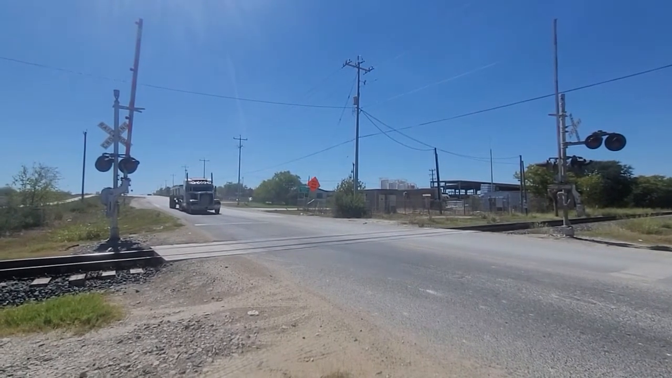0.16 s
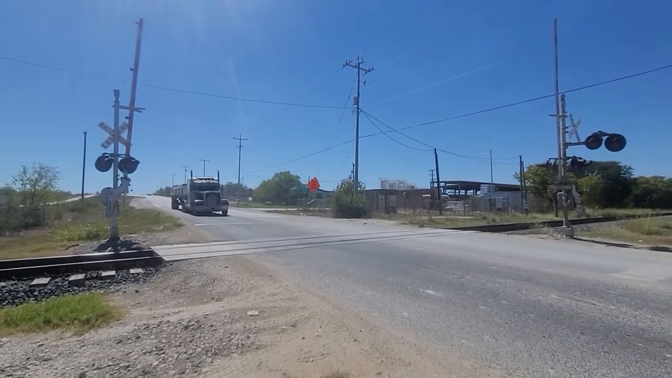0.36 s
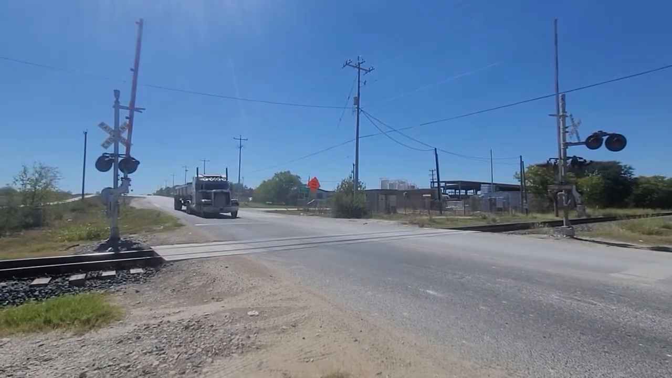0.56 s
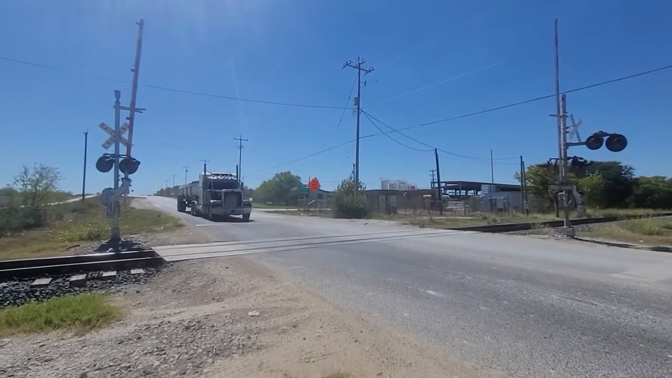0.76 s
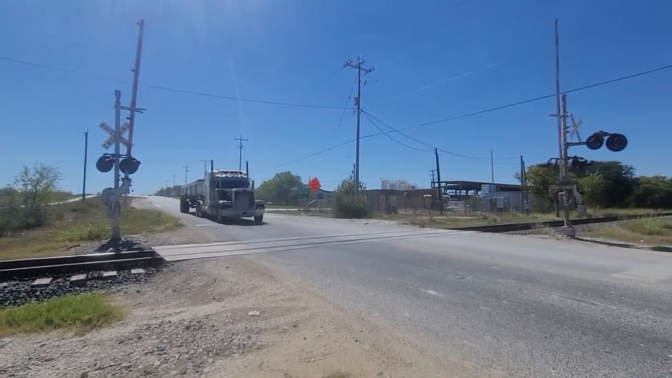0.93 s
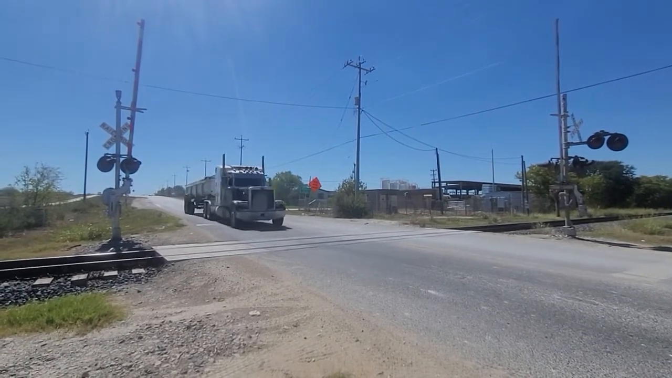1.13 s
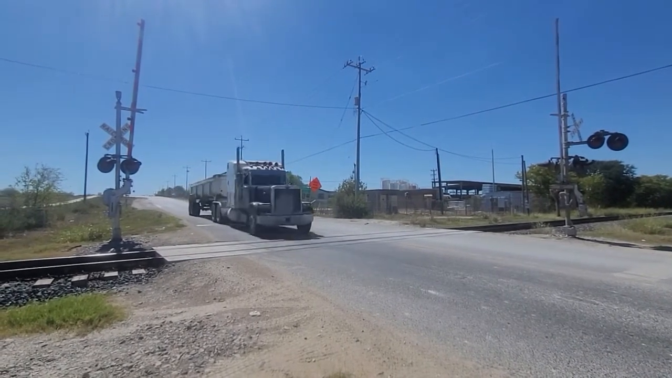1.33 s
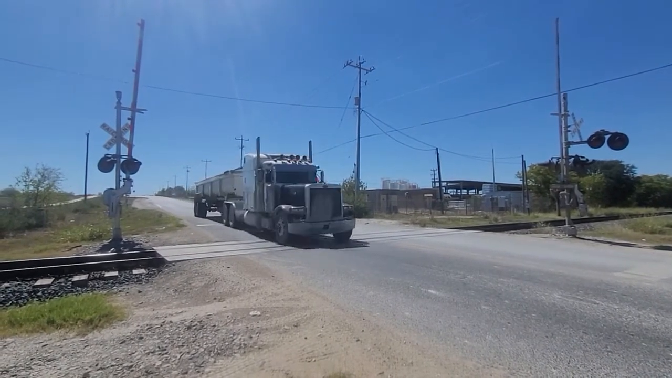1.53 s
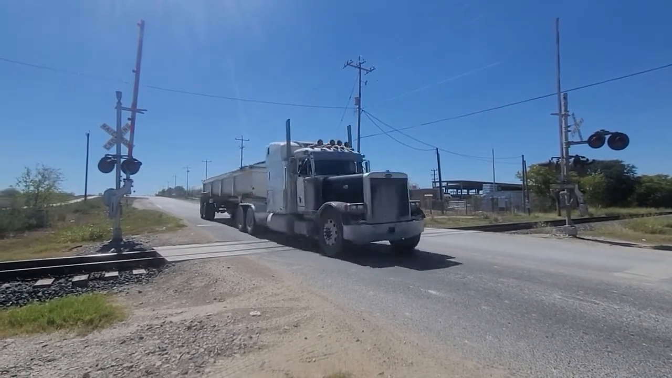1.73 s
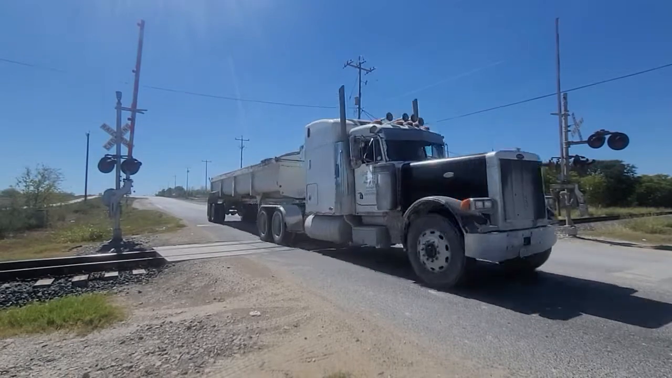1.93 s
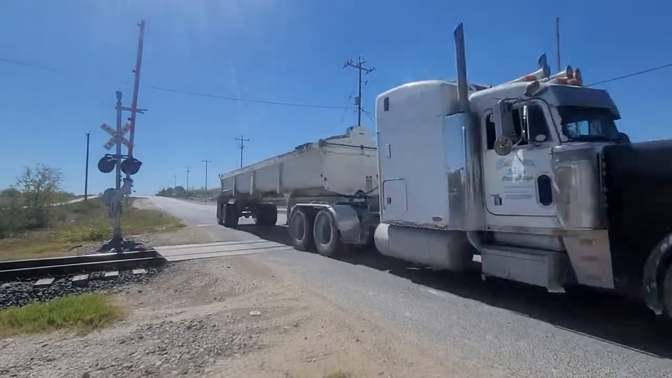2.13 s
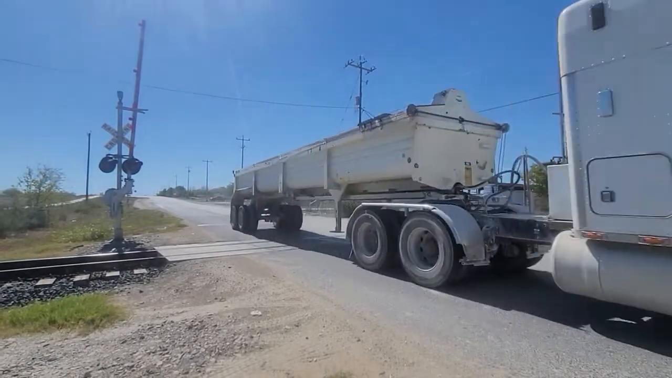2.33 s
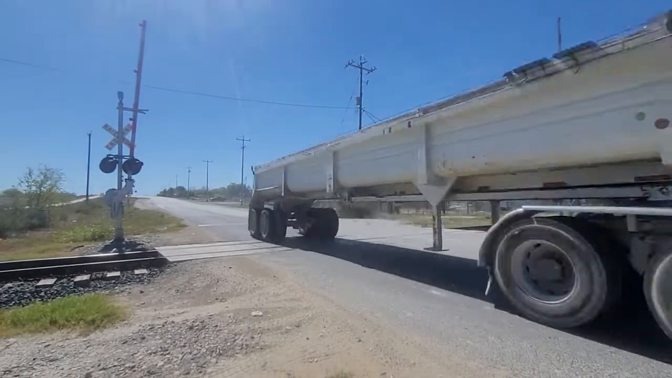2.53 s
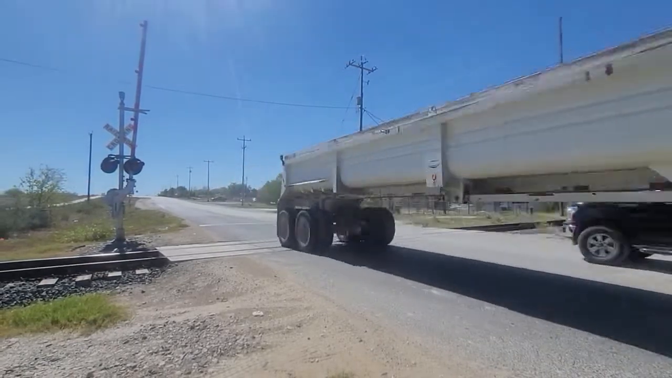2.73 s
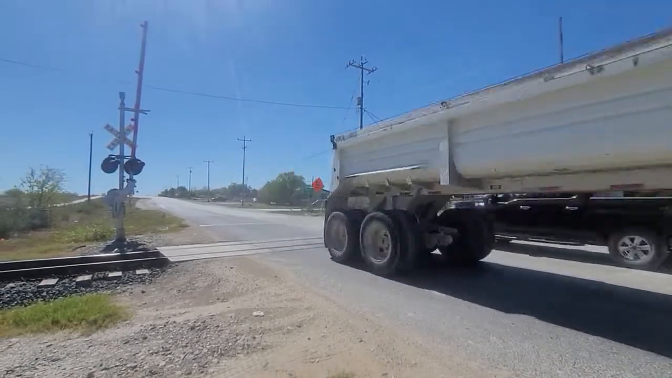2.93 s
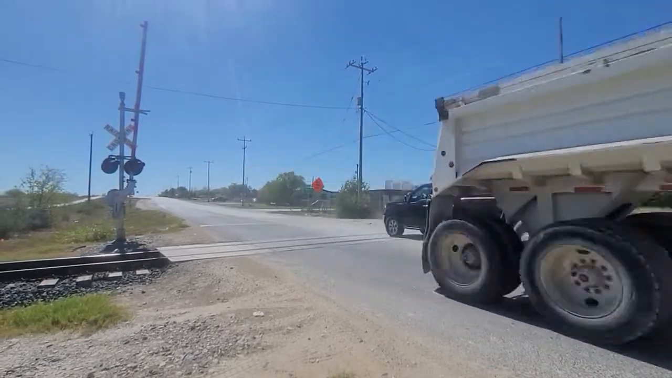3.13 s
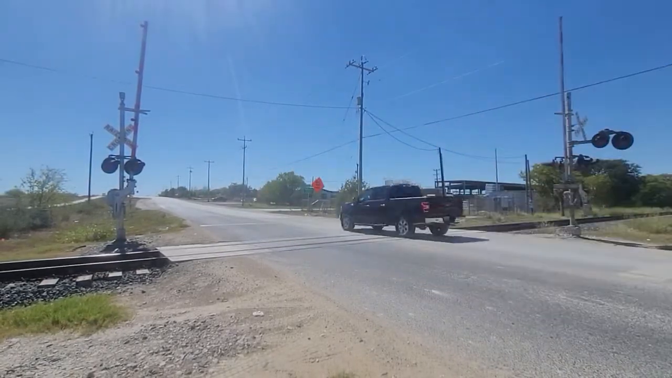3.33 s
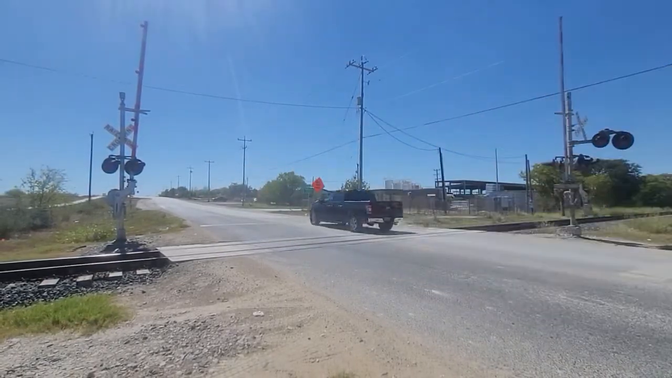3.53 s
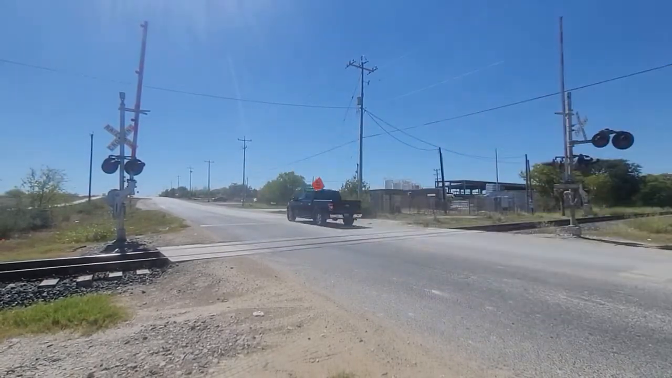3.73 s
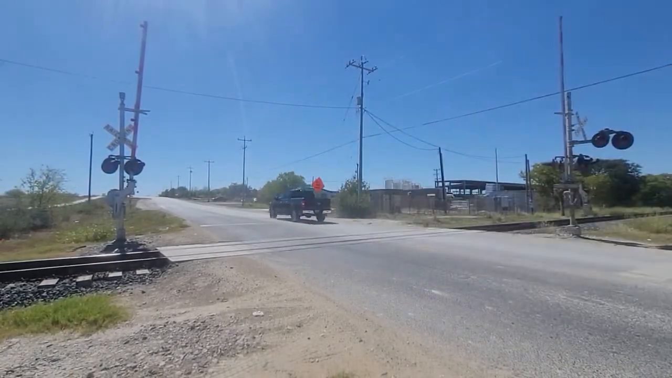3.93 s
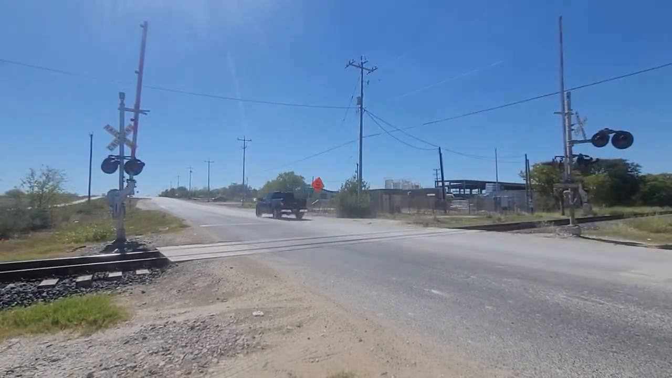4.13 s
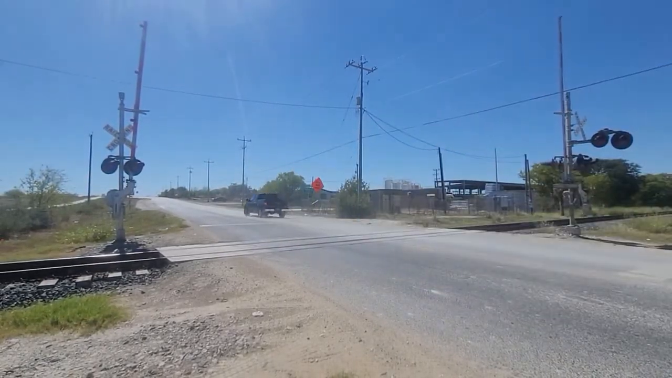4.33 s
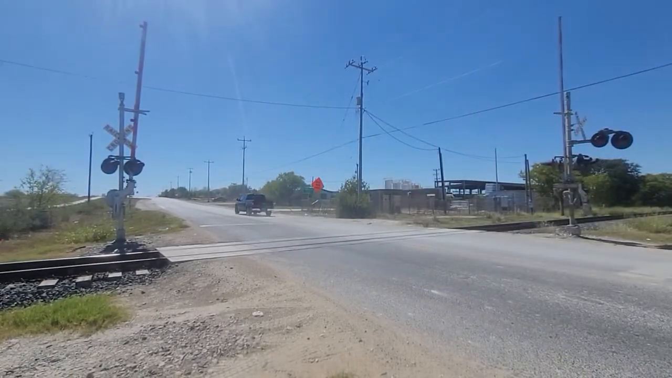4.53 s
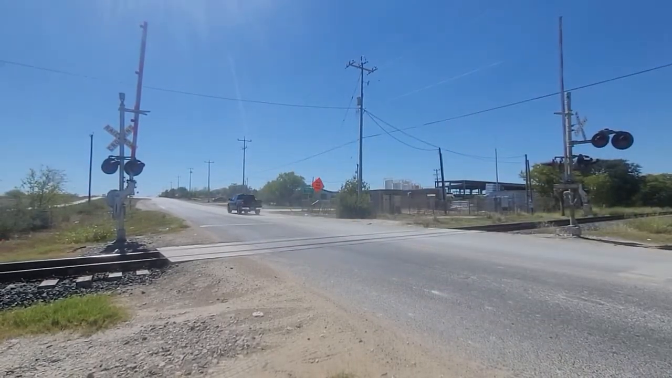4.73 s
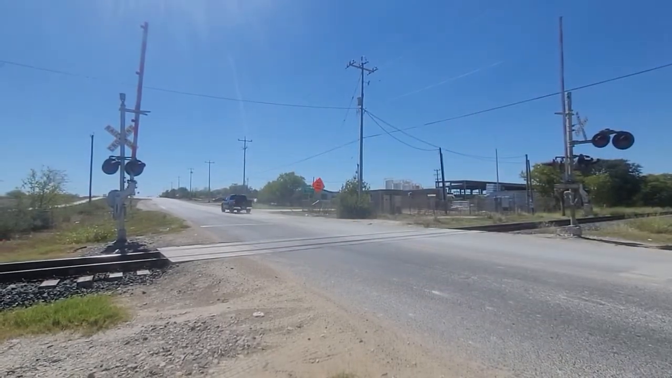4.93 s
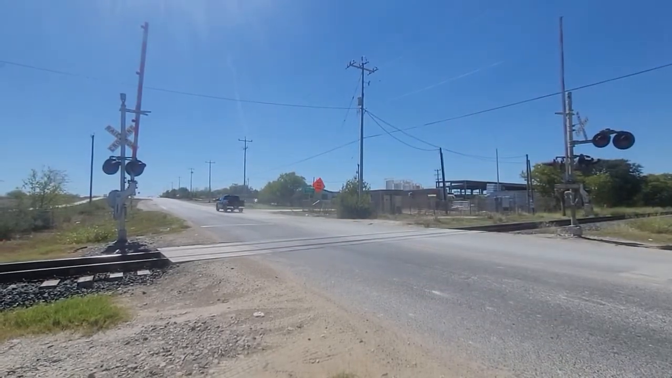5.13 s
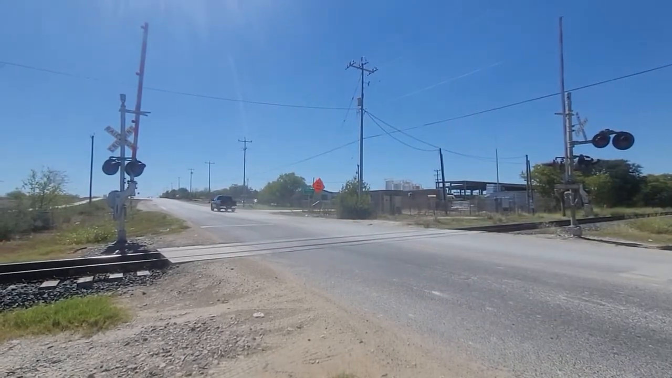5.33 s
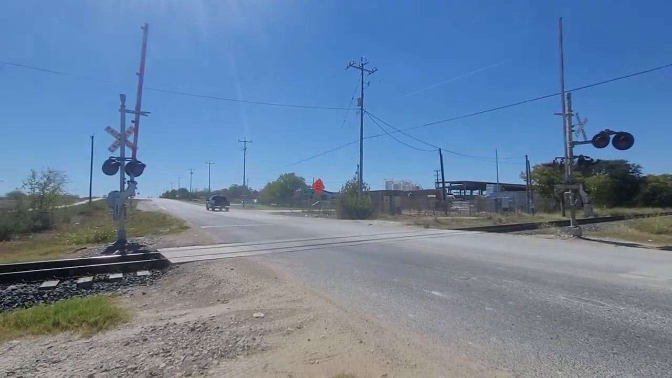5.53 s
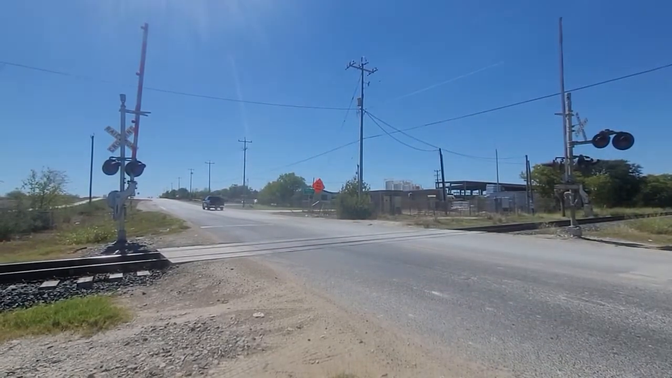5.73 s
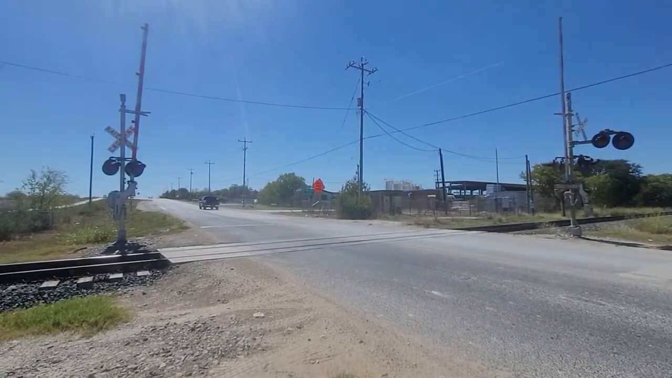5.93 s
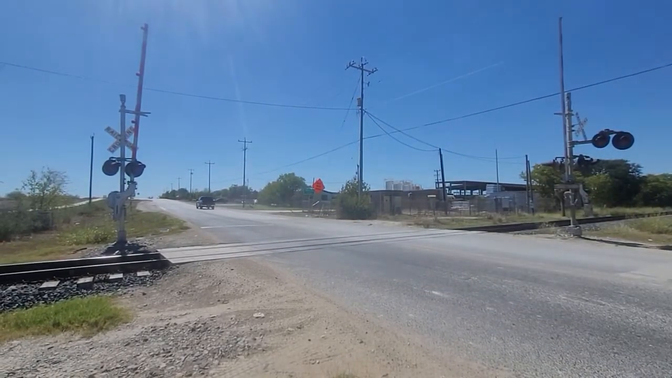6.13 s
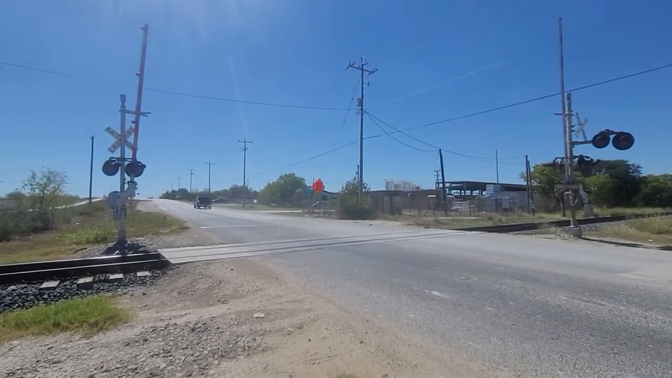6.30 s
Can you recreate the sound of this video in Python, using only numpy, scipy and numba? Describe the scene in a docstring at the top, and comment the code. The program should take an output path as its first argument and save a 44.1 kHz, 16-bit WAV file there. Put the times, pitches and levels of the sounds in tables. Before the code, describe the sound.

A heavy dump truck clanks and booms over a railroad crossing and passes close by, then a pickup's tyres recede.

```python
"""Tipper truck on a level crossing.

A heavy tipper rolls over the rails and passes a phone on the verge; a pickup then drives away.
The empty steel body booms, drones and clanks on each jolt, wheels knock on the rails, air sings
in the tread grooves, tyres hiss, the diesel hums far off. The phone's two ports hear each vehicle
a fraction of a millisecond apart, each in its own colour."""
import sys
import numpy as np
from scipy import signal
from scipy.fft import rfft, irfft, next_fast_len
from scipy.io import wavfile
from scipy.ndimage import uniform_filter1d, map_coordinates
from numba import njit

SR = 44100
rng = np.random.default_rng(int(sys.argv[2]) if len(sys.argv) > 2 else 0)


def dump_mix(stems):
    """Bounce the given channels to the path in sys.argv[1] as a 16-bit WAV at rate SR."""
    frames = np.atleast_2d(stems).T  # one column per channel
    limited = np.clip(frames, -1, 1)  # hard clip at full scale
    pcm = np.round(limited * 32767).astype(np.int16)
    wavfile.write(sys.argv[1], SR, pcm)


N = 284886

# diesel hum: t/s, level/dB
DIESEL_LEVEL = [(0, -32.5), (1.4, -35.5), (2.4, -27.5), (3.6, -39), (4.1, -56), (4.4, -31.5), (6.46, -43.5)]
# its harmonics: order, gain/dB
DIESEL_ORDERS = [(1, 0), (2, -1), (3, -11)]
# source zones on the truck: front/m, rear/m (behind the bumper), level/dB alongside front, rear,
# extra loss/(dB/m) coming, leaving, far floor/dB
RUMBLE_ZONE = (8.5, 30.5, -16, -23.5, 0.02, 0.2, -31)
DRONE_ZONE = (6, 24.5, -15.5, -16, 0.07, 0.16, -38.5)
TREAD_ZONE = (3.5, 14.5, -18.5, -17, -0.03, 0.23, -55)
WHOOSH_ZONE = (-1, 17, -24, -21, -0.12, 0.24, -61)
CLATTER_ZONE = (1.5, 17, -28.5, -30.5, 0.07, .5, -62.5)
HISS_ZONE = (5.5, 26., -33.5, -47, .95, 1.6, -100)
# noise spectra: f/Hz, relative density/dB
DRONE_SPECTRUM = [(65, -33), (110, -8.5), (140, -8.5), (194, 1.5), (254, -2.5), (312, 0.5), (392, -4),
                  (481, -10.5), (600, -13), (780, -17.5), (1320, -120)]
WHOOSH_SPECTRUM = [(560, -15), (950, -14), (1000, -3), (1680, -5.5), (1990, -12.5), (2250, -14.5),
                   (3000, -22), (3900, -31), (6600, -120)]
CLATTER_SPECTRUM = [(1180, -24), (2000, 4.5), (2240, -17), (2670, -5.5), (2970, -2.5), (3920, -5),
                    (4890, -5), (5340, -2.5), (6570, -1.5), (7500, -17.5), (9000, -38), (11700, -43),
                    (19800, -120)]
HISS_SPECTRUM = [(4400, -8), (7500, 4), (9500, -3.5), (13800, -2), (16500, -8)]
PICKUP_SPECTRUM = [(260, -37), (450, -8), (499, -9.5), (693, -4.5), (804, -0.5), (1000, -6.5), (1370, -4),
                   (1620, -4), (2210, -21.5), (2930, -25.5), (3450, -27.5), (3880, -38), (6440, -61),
                   (9200, -90), (15700, -73)]
# air modes of the tread grooves: f/Hz, width/Hz, relative level/dB
TRUCK_GROOVES = [(782, 142, -1), (694, 145, -3.5)]
PICKUP_GROOVES = [(831, 180, 9.5), (1644, 190, -4.5)]
# trailer plate modes: f/Hz, relative level/dB
PLATE_MODES = [(1930, -5), (2420, -14.5), (3130, -9.5), (3680, -16.5), (4400, -12.5), (5300, -10.5),
               (6040, -11), (6600, -15.5)]
# body boom, lower once the trailer is alongside: t/s, nominal f/Hz, level/dB
BODY_BOOM = [(1.05, 93, -61), (1.55, 96, -27), (1.8, 91.6, -29), (2.08, 95.16, -19.5), (2.27, 67.6, -26),
             (2.42, 62.6, -18), (2.6, 67.1, -20), (2.72, 72.3, -31), (3.04, 58.9, -17.5), (3.3, 69, -25),
             (3.53, 88.8, -33), (3.85, 76.8, -21.5), (4.0, 83.9, -33.5), (4.45, 67, -50)]
# loose steel slams: t/s, level/dB, hiss/dB re level, main ring f/Hz, ring/dB re level, t60/s
SLAMS = [(1.233,-23,-44,5500,-19,0.41),(1.34,-26,-47.5,4380,-8,0.44),(1.408,-30,-39,4380,-12,0.25),
         (1.516,-22.5,-16,6300,-12,0.055),(1.55,-12.5,-23,6670,-11.5,0.24),(1.5998,-21,-18,5330,-13,0.045),(1.612,-14,-20,6560,-18,0.03),
         (1.6882,-17.5,-21,3560,-9.5,0.27),(1.734,-22,-10,3170,-8,0.2),(1.778,-17.5,-13,5800,-11,0.29),(1.8407,-22.5,-12,6500,-4,0.11),
         (1.875,-27,-24,5470,1,0.12),(1.99,-13.5,-19,6700,-13,0.13),(2.063,-11.5,-18.5,6580,-10.5,0.14),(2.1392,-23,-9,6800,-8,0.35),
         (2.2319,-19,-13.5,5470,-6,0.57),(2.3,-36,-30,6700,11,0.1),(2.3395,-18,-18,5730,-6.5,0.33),(2.368,-12,-24,5430,-15,0.38),
         (2.428,-26,-23,5240,-8,0.092),(2.4736,-9,-25,5490,-8.5,0.11),(2.562,-14.5,-21,5150,-24,0.37),(2.6602,-20,-18,5730,-12,0.26),
         (2.7865,-9,-21,5810,-13,0.23),(3.05,-25,-28,5610,-10,0.3),(3.105,-13,-18,2260,-8.5,0.31),(3.336,-20,-23.5,3640,-12,0.24),
         (3.452,-39,-5,6700,-10,0.17),(3.613,-31,-24,6300,-16,0.19),(3.6599,-30.5,-25,2500,-23,0.8),(3.718,-35,-28,3060,-14,0.15),
         (3.829,-34,-25,3825,-11,0.2),(3.9286,-36,-31,2557,-14,0.12),(4.041,-36,-23,2890,-9,0.15),(4.141,-42,-24,2890,-2,0.47),
         (5.473,-51,-48.5,3370,-2,0.2)]
# wheel blows: t/s, level/dB, f/Hz
WHEEL_KNOCKS = [(1.54, -13.5, 92.4), (1.603, -10.5, 291), (1.62, -10.5, 187.5), (1.686, -8, 790),
                (1.734, -6, 770), (2.01, -5.5, 822), (2.103, -9, 806), (2.19, -4, 797), (2.234, -15, 304),
                (2.249, -9, 767), (3.336, -16, 1343), (3.379, -11.5, 743), (3.535, -15, 391),
                (3.603, -12.5, 1310), (6.0, -29, 780)]
# tailgate panel: t/s, level/dB
TAILGATE_LEVEL = [(2.9, -45), (3.3, -31), (4.4, -34.5), (5.2, -39), (6.46, -55)]
# pickup: t/s, tyre level/dB, tread level/dB, rumble level/dB
PICKUP_LEVELS = [(2.4, -65, -51, -54), (3.2, -39, -37, -43), (3.7, -34.5, -34.5, -27.5),
                 (4.4, -32, -34, -36), (5.3, -35, -53, -33), (6.46, -37.5, -43, -46)]
# its whine: t/s, f/Hz
WHINE_PITCH = [(5.7, 338), (6.46, 351)]
# its whine: t/s, level/dB
WHINE_LEVEL = [(5.7, -63), (6.05, -49.5), (6.46, -42.5)]
# left port re right: f/Hz, gain/dB
PORT_BALANCE = [(60, 0), (200, -1.5), (400, -4.5), (550, -4.5), (800, -3.5), (1300, -2), (1800, -3),
                (2500, 0), (3300, -2), (5500, -3), (6800, -6), (8000, 4.5), (9500, -3.5), (15000, -1)]
# left-right difference: f/Hz, gain/dB
SIDE_GAIN = [(30, 6), (100, -4), (600, 3.5), (1400, 1.5), (3000, 0), (6500, 0)]

SPEED_M_S, VERGE_M, BUMPER_PASSES_S = 17.15, 5.87, 1.569
DIESEL_HZ, ENGINE_AT_M, TREAD_AT_M, BODY_AT_M = 39.64, 13.82, 14.6, 6.92
LAG_MS, LAG_SWING_MS, PICKUP_LAG_MS = 0.091, 0.381, -0.22  # left port's delay
FOCUS_AHEAD, FOCUS_BEHIND, FOCUS_AT_M = 0.38, 1.9, 45  # the tail sounds narrower than the flank
RAILS_S, SHAKE_UP_S, CALM_CLATTER_DB, CALM_HISS_DB = 1.41, 0.52, -11, -12
PINGS_PER_PLATE_S, PING_DB, TICK_DB, PING_SCATTER_DB = 30, -6, -11, 3.5
CHATTER_S, ATTACK_SHARE, ATTACK_CAP_S, GRIT_DB, GRIT_S = 0.007, 0.015, 0.0025, 2.2, 0.005
SLAM_NOISE_DB, PLATES_DB, PLATE_SCATTER_DB = -15.5, -9.5, 3
PLATE_WIDTH_HZ, RING_WIDTH_HZ = 70., 330.
KNOCK_T60_CYCLES, KNOCK_RISE_S = 36, 0.00086
LULL_S, LULL_WIDTH_S, LULL_DB = 1.66, 0.015, -6
BASS_CUT_HZ, TOP_CUT_HZ = 30., 15820
TIME_S = np.arange(N) / SR


def undb(db):
    """dB to gain."""
    return 10 ** (np.asarray(db) / 20)


def unit(x):
    """Scale to rms 1."""
    return x / np.sqrt(np.mean(x ** 2))


def curves(table):
    """Columns interpolated to one value a sample."""
    times_s, *columns = np.transpose(table)
    return [np.interp(TIME_S, times_s, column) for column in columns]


def colour(x, spectrum):
    """Filter by (f/Hz, gain/dB) points; ends mirrored against clicks."""
    hz, db = np.transpose(spectrum)
    edge = SR // 20
    x = np.concatenate([x[..., edge:0:-1], x, x[..., -2:-edge:-1]], axis=-1)
    size = next_fast_len(x.shape[-1])
    bins_hz = np.maximum(np.arange(size // 2 + 1) * SR / size, 1)
    gain = undb(np.interp(np.log(bins_hz), np.log(hz), db))
    return irfft(rfft(x, size) * gain, size)[..., edge:edge + N]


@njit
def svf(x, hz, width_hz):
    """State-variable band-pass, moving centre."""
    y, band, low = np.empty(len(x)), 0., 0.
    for i in range(len(x)):
        g, k = np.tan(np.pi * hz[i] / SR), width_hz / hz[i]
        v = (band + g * (x[i] - low)) / (1 + g * (g + k))
        band, low, y[i] = 2 * v - band, low + 2 * g * v, k * v
    return y


def resonate(rows, hz, width_hz):
    """Band-pass each row; hz is a number or a curve."""
    return np.array([svf(row, hz * np.ones(len(row)), float(width_hz)) for row in rows])


def walk(rate_hz):
    """Random steps, smoothed twice; spread near 1."""
    hold = int(SR / rate_hz)
    steps = np.repeat(rng.standard_normal(N // hold + 1), hold)
    return 1.43 * uniform_filter1d(uniform_filter1d(steps, hold), hold)[:N]


def strands():
    """White noise rows: shared, left, right."""
    return rng.standard_normal((3, N))


def noise(spectrum):
    """Coloured strands, rms 1."""
    return unit(colour(strands(), spectrum))


def ports(x, lag_ms, coherence):
    """Strands to stereo; the shared one lags on the left."""
    coherence = np.clip(coherence, 0, 1)
    late = map_coordinates(x[0], [np.arange(N) - lag_ms * SR / 1000], order=3, mode="mirror")
    return np.sqrt(coherence) * np.array([late, x[0]]) + np.sqrt(1 - coherence) * x[1:]


def tone(hz, db, orders, waver_db, drift, rate_hz):
    """Wavering sines on multiples of a pitch curve."""
    phase = 2 * np.pi * np.cumsum(hz * (1 + drift * walk(rate_hz))) / SR
    out = 0
    for order, order_db in orders:
        gain = np.sqrt(2) * undb(db + order_db + waver_db * walk(rate_hz))
        out += gain * np.sin(order * phase + rng.uniform(0, 2 * np.pi))
    return out


def past_m(at_m):
    """How far a point at_m behind the bumper has passed the phone."""
    return SPEED_M_S * (TIME_S - BUMPER_PASSES_S) - at_m


def bearing(at_m):
    """Sine of the direction to that point: -1 coming, 1 going."""
    return past_m(at_m) / np.hypot(past_m(at_m), VERGE_M)


def doppler(at_m):
    """Pitch factor of that point."""
    return 1 / (1 + SPEED_M_S * bearing(at_m) / 343)


def passing_db(front_m, rear_m, front_db, rear_db, coming_db_m, leaving_db_m, far_db):
    """Level from a zone's nearest point: spreading and extra loss, over a far floor."""
    gap_m = np.maximum(0, np.maximum(-past_m(front_m), past_m(rear_m)))
    range_m = np.hypot(gap_m, VERGE_M)
    extra_db_m = np.where(past_m(front_m) < 0, coming_db_m, leaving_db_m)
    loss_db = 20 * np.log10(range_m / VERGE_M) + (range_m - VERGE_M) * extra_db_m
    source_db = np.interp(past_m(0), [front_m, rear_m], [front_db, rear_db])
    return 20 * np.log10(np.hypot(undb(source_db - loss_db), undb(far_db)))


def diesel_hum():
    """Low engine harmonics, Doppler shifted."""
    hz = DIESEL_HZ * doppler(ENGINE_AT_M)
    return tone(hz, *curves(DIESEL_LEVEL), DIESEL_ORDERS, waver_db=3.5, drift=0.0083, rate_hz=6)


def wheel_rumble(db):
    """Low roll of wheels and chassis."""
    roll = resonate(resonate(strands(), hz=80, width_hz=73), hz=70, width_hz=135)
    return unit(roll) * undb(db + 1.4 * walk(10))


def body_drone():
    """The empty body drones; its long waves reach both ports alike."""
    drone = noise(DRONE_SPECTRUM) * undb(passing_db(*DRONE_ZONE) + 1.13 * walk(20))
    drone[1:] = colour(drone[1:], [(150, -23.5), (450, 2.0)])
    return drone


def tread_song(db, grooves, shift=1):
    """Air rings in the tread grooves; shift is the Doppler factor."""
    air, song = strands(), 0
    for hz, width_hz, mode_db in grooves:
        song += undb(mode_db) * resonate(resonate(air, hz * shift, width_hz), hz * shift, 2 * width_hz)
    return unit(song) * undb(db + 1.64 * walk(25.2))


def rolling_noise(spectrum, db, slam_gain):
    """Noise band of the moving truck; slams add to it in power."""
    return noise(spectrum) * np.hypot(undb(db), slam_gain)


def plate_pings():
    """Small loose parts tap the plates at random: wandering rings plus bare ticks."""
    rings, ticks = 0, 0
    for hz, db in PLATE_MODES:
        taps = (rng.random(N) < PINGS_PER_PLATE_S / SR) * undb(PING_SCATTER_DB * rng.standard_normal(N))
        rings += undb(db / 2) * svf(taps, hz * (1 + .04 * walk(8)), PLATE_WIDTH_HZ)
        ticks += taps
    pings = undb(PING_DB) * unit(rings) + undb(TICK_DB) * unit(colour(ticks, CLATTER_SPECTRUM))
    return np.array([pings] * 3)


def body_boom():
    """The empty body booms on the jolts: one low gliding tone."""
    return tone(*curves(BODY_BOOM), [(0.98, 0.0026)], waver_db=-2.0, drift=0.04, rate_hz=20)


def steel_slams():
    """Loose steel slams, chatters and decays: clatter envelope, hiss envelope, plate rings."""
    clatter, hiss, rings = np.zeros(N + SR), np.zeros(N + SR), np.zeros((3, N + SR))
    t = np.arange(int(.4 * SR)) / SR
    step, ring_len = int(GRIT_S * SR), len(t) // 2
    for start_s, db, hiss_db, ring_hz, ring_db, t60_s in SLAMS:
        i = int((start_s - .002) * SR)
        attack = 1 - np.exp(-t / min(ATTACK_SHARE * t60_s, ATTACK_CAP_S))
        hold_s = min(CHATTER_S, t60_s / 20)
        shape = attack * undb(-60 * np.maximum(t - hold_s, 0) / t60_s)
        contacts = np.repeat(rng.standard_normal(len(t) // step + 1), step)
        grit = uniform_filter1d(contacts, step // 2)[:len(t)]
        rough = shape * undb(db + GRIT_DB * grit)
        clatter[i:i + len(t)] += undb(SLAM_NOISE_DB) * rough
        hiss[i:i + len(t)] += undb(hiss_db) * rough
        modes = [(ring_hz, ring_db, RING_WIDTH_HZ)]
        for hz, plate_db in PLATE_MODES:
            struck_db = plate_db + PLATES_DB + PLATE_SCATTER_DB * rng.standard_normal()
            modes.append((hz, struck_db, PLATE_WIDTH_HZ))
        scrape = rng.standard_normal((3, ring_len))  # many small contacts: rings are narrow noise
        for hz, mode_db, width_hz in modes:
            ring = resonate(resonate(scrape, hz, width_hz), hz, width_hz=700)
            rings[:, i:i + ring_len] += undb(mode_db) * unit(ring) * (shape * rough)[:ring_len]
    return clatter[:N], hiss[:N], rings[:, :N]


def wheel_knocks():
    """Wheels hit rail and panel edges: two damped partials a blow."""
    out, t = np.zeros(N), np.arange(int(.2 * SR)) / SR
    attack = 1 - np.exp(-t / KNOCK_RISE_S)
    for start_s, db, hz in WHEEL_KNOCKS:
        i = int(start_s * SR)
        phase = 2 * np.pi * hz * t
        partials = np.sin(phase) + 0.26 * np.sin(1.35 * phase)
        out[i:i + len(t)] += undb(db - 60 * t * hz / KNOCK_T60_CYCLES) * attack * partials
    return np.array([out] * 3)


def tailgate_hum():
    """One narrow panel resonance, driven by noise."""
    return unit(resonate(strands(), hz=198, width_hz=14)) * undb(curves(TAILGATE_LEVEL)[0])


def truck():
    """All truck sources at the two ports; lag and coherence follow the bearing."""
    rumble = wheel_rumble(passing_db(*RUMBLE_ZONE))
    boom = body_boom()
    drone = body_drone()
    tread = tread_song(passing_db(*TREAD_ZONE), TRUCK_GROOVES, doppler(TREAD_AT_M))

    calm = np.clip(1 - (TIME_S - RAILS_S) / SHAKE_UP_S, 0, 1)  # steel is quieter before the rails
    clatter_db = passing_db(*CLATTER_ZONE) + CALM_CLATTER_DB * calm
    hiss_db = passing_db(*HISS_ZONE) + CALM_HISS_DB * calm
    nearness = VERGE_M / np.hypot(past_m(BODY_AT_M), VERGE_M)
    rattle = walk(30.14) * np.sqrt(nearness)  # small parts shake all the treble together
    slam_gain, slam_hiss_gain, rings = steel_slams()
    whoosh_db = passing_db(*WHOOSH_ZONE) + 0.51 * rattle + 0.85 * walk(22.6)
    whoosh = rolling_noise(WHOOSH_SPECTRUM, whoosh_db, 1.9 * slam_gain)
    clatter = rolling_noise(CLATTER_SPECTRUM, clatter_db + 3.0 * rattle, slam_gain)
    hiss = rolling_noise(HISS_SPECTRUM, hiss_db + 2.0 * rattle, slam_hiss_gain)
    hum = diesel_hum()
    drone += tailgate_hum()
    pings = plate_pings() * undb(clatter_db) * nearness

    lull = undb(LULL_DB * np.exp(-((TIME_S - LULL_S) / LULL_WIDTH_S) ** 2))  # dip between two axles
    lag_ms = LAG_MS + LAG_SWING_MS * bearing(BODY_AT_M)
    focus = np.interp(bearing(FOCUS_AT_M), [-1, 1], [FOCUS_AHEAD, FOCUS_BEHIND])
    return (hum + boom + hiss[1:]
            + ports(rumble * lull, lag_ms, coherence=0.98)
            + ports(drone * lull, lag_ms + 0.11, 0.72)
            + ports(tread * lull, lag_ms + 0.047, 1.04 * focus)
            + ports(whoosh, lag_ms, 0.52 * focus)
            + ports(clatter, lag_ms - 0.1, 0.093 * focus)
            + ports(pings, lag_ms, 1.0)
            + ports(rings, lag_ms, 0.4)
            + ports(wheel_knocks(), lag_ms, 0.73))


def pickup():
    """Tyre roar, tread song and rumble swell and recede; a faint whine rises at the end."""
    tyre_db, tread_db, rumble_db = curves(PICKUP_LEVELS)
    tyres = noise(PICKUP_SPECTRUM) * undb(tyre_db + 1.2 * walk(12))
    whine = tone(*curves(WHINE_PITCH), *curves(WHINE_LEVEL), [(1, 0)],
                 waver_db=2.5, drift=0.004, rate_hz=6)
    tyres += tread_song(tread_db, PICKUP_GROOVES)
    rumble = wheel_rumble(rumble_db)
    return ports(tyres, PICKUP_LAG_MS, 0.72) + ports(rumble, PICKUP_LAG_MS, 0.98) + whine


def scene():
    """Both vehicles, stereo."""
    return truck() + pickup()


def record(dry):
    """Phone: port colour, widening, bass cut, clipping, top cut."""
    hz, db = np.transpose(PORT_BALANCE)
    left, right = colour(dry[0], np.c_[hz, db / 2]), colour(dry[1], np.c_[hz, -db / 2])
    mid, side = (left + right) / 2, colour((left - right) / 2, SIDE_GAIN)
    bass_cut = signal.butter(2, BASS_CUT_HZ, "high", fs=SR, output="sos")
    top_cut = signal.ellip(14, .2, 70, TOP_CUT_HZ, fs=SR, output="sos")
    stereo = signal.sosfilt(bass_cut, np.array([mid + side, mid - side]))
    return signal.sosfilt(top_cut, np.clip(stereo, -1, 1))


dry = scene()
out = record(dry)
dump_mix(out)
```